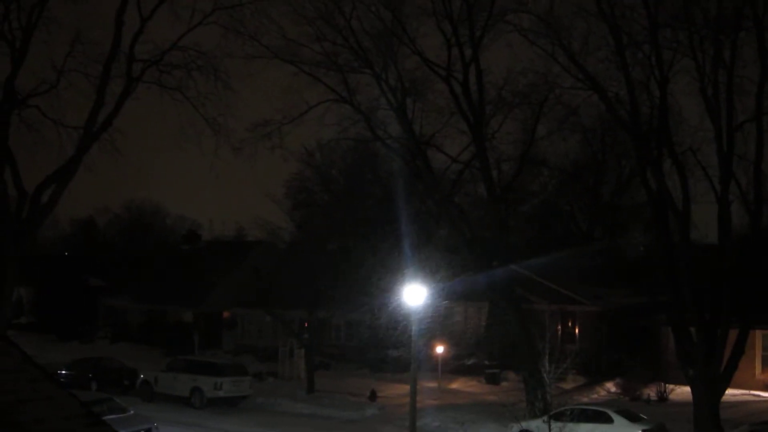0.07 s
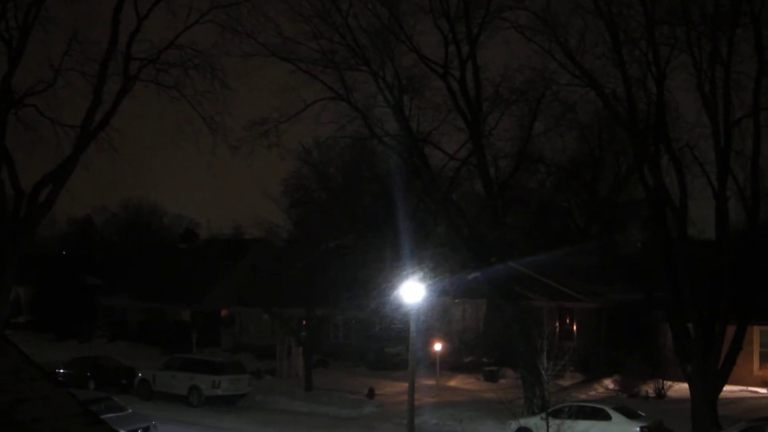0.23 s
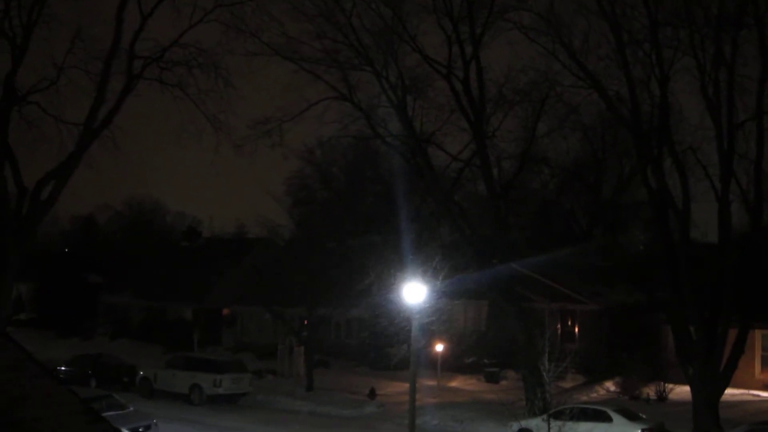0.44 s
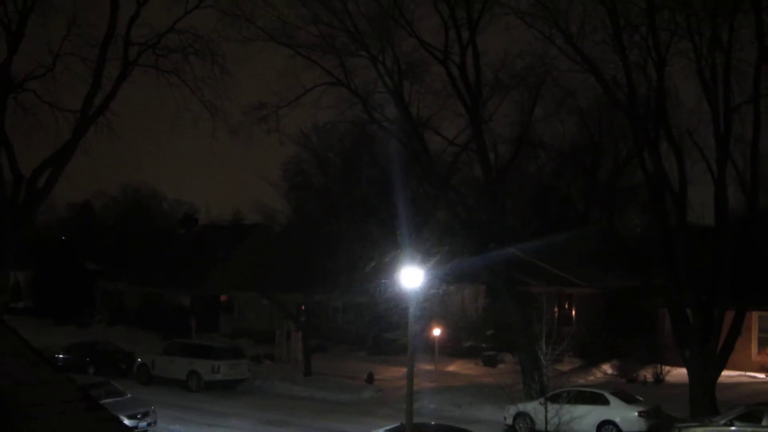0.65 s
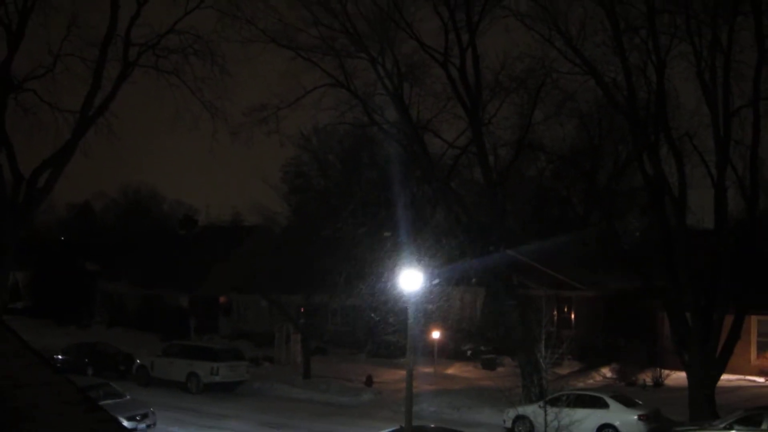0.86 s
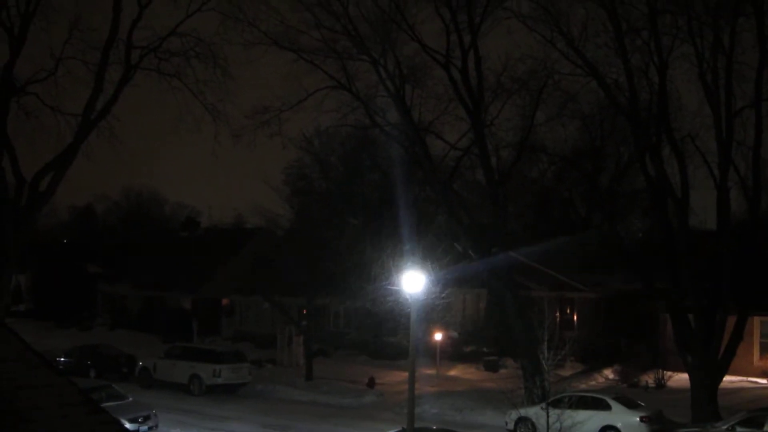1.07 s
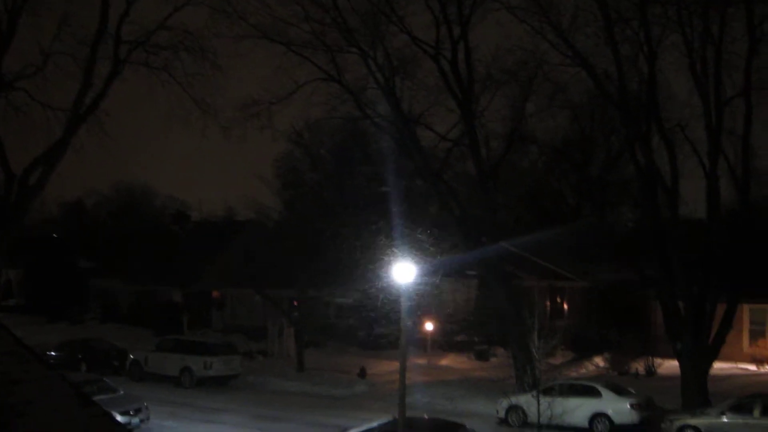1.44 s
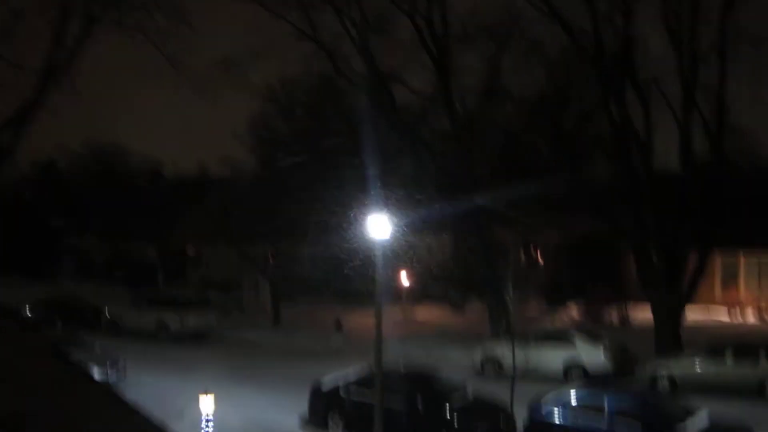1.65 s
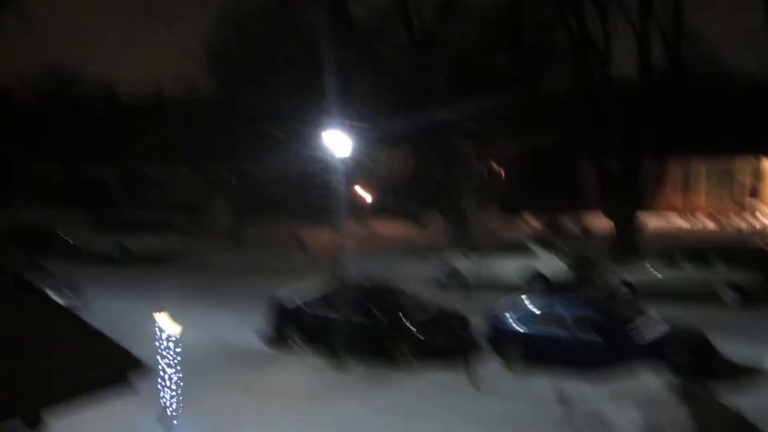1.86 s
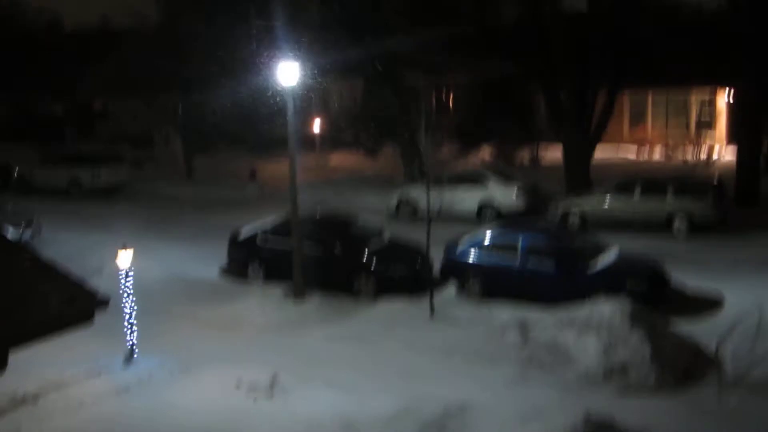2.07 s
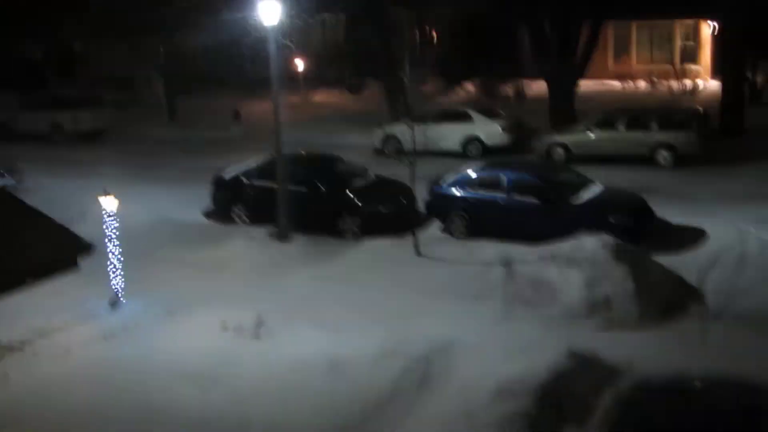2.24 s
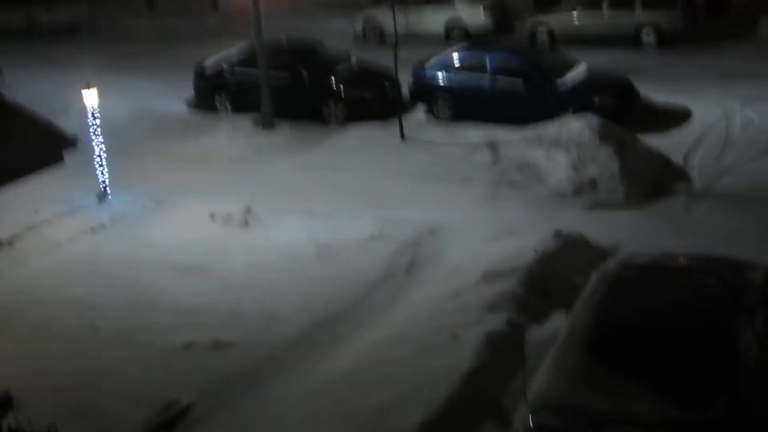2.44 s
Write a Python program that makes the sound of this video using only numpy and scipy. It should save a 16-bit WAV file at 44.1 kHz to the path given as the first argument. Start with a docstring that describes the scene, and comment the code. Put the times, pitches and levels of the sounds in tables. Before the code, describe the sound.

Wind rumbles low on the microphone, soon breaking into dull, uneven buffets that ease toward the end. Behind it lie the faint hush of a snowy street at night and a thin electronic hiss.

```python
"""A low rumble of wind right on the microphone, soon breaking into dull buffets.
Eddies roll over the port, each a pressure swing of about one cycle, stronger and quicker in a gust.
The place is a quiet, snowy street at night, with the town hushing far off and air in the bare trees.
The microphone sits in a hand-held camera, which adds its own hiss, a thin electronic whine
and, in the second half, a faint handling rustle."""
import sys
import numpy as np
from scipy import signal
from scipy.fft import rfft, irfft
from scipy.io import wavfile

SR = 44100
rng = np.random.default_rng(int(sys.argv[2]) if len(sys.argv) > 2 else 0)


def output_pcm(signal):
    """Save a mono or channel-first signal as 16-bit PCM at the path in sys.argv[1].

    Samples are clipped to [-1, 1] before scaling.
    """
    pcm = np.clip(np.atleast_2d(signal).T, -1, 1) * 32767
    wavfile.write(sys.argv[1], SR, np.round(pcm).astype(np.int16))


N = 110250

# far hush of the town: frequency_hz, relative_density_db
TOWN_SPECTRUM = [(200, -19), (450, 4), (650, -1), (900, -1.5), (1350, -2.5), (1650, -5.5), (2000, -12),
                 (3000, -25.5), (6000, -34)]
# its slow rise and fall: time_s, level_db
TOWN_LEVEL = [(0, -48.5), (.3, -48), (.65, -49.5), (.95, -47.5), (1.5, -48), (1.82, -46.5), (2.15, -47.5),
              (2.5, -47)]
# air in the bare trees: frequency_hz, relative_density_db
TREES_SPECTRUM = [(800, -48), (1700, -2), (2200, 0), (2700, 1), (3300, -3.5), (4200, -8), (5500, -14.5),
                  (9000, -41)]
# its slow rise and fall: time_s, level_db
TREES_LEVEL = [(0, -54.5), (.42, -53.5), (.68, -55.5), (1.18, -57), (1.65, -56), (2.5, -56)]
# the camera's electronic hiss: frequency_hz, relative_density_db
HISS_SPECTRUM = [(1000, -3), (4000, 1.5), (6500, 1), (8000, 1), (10000, -2), (12000, -5.5), (14000, -17),
                 (15700, -25)]
# its slight, uneven fall: time_s, level_db
HISS_LEVEL = [(0, -60), (.4, -61.5), (.65, -63), (1.05, -61.5), (2.5, -64.5)]
# electronic whine, a beating pair with two faint companions: pitch_hz, rms_level_db
WHINE_TONES = [(7822, -87), (7852, -76.3), (7882, -75.7), (13195, -94)]
# handling rustle on the camera body: frequency_hz, relative_density_db
RUSTLE_SPECTRUM = [(2000, -8), (5000, -2), (9000, -0.5), (12000, -4), (15700, -12)]
# the rustle coming in as the camera tilts down: time_s, level_db
RUSTLE_LEVEL = [(1.3, -89), (1.42, -63), (1.87, -63), (2.0, -65), (2.1, -63), (2.2, -65.5), (2.33, -62.5),
                (2.5, -65)]
# steady rumble of air moving past the microphone: frequency_hz, relative_density_db
RUMBLE_SPECTRUM = [(12, -24), (20, 8.5), (35, 5), (70, 4), (140, 2.5), (220, 1), (320, -3), (480, -11),
                   (700, -22), (1200, -46.5)]
# strength of the wind, as the typical level of its small eddies: time_s, level_db
GUST_LEVEL = [(0, -41), (.15, -43), (.28, -36), (.35, -30.5), (.47, -30.5), (.6, -27), (.7, -34),
              (.78, -31), (.88, -28.5), (.97, -34), (1.12, -29.5), (1.21, -36.5), (1.32, -36.5),
              (1.39, -33), (1.48, -29), (1.59, -41), (1.67, -35), (1.77, -32.5), (1.88, -48), (2.12, -49.5),
              (2.22, -38), (2.5, -51)]
# strong eddies that strike the microphone port: centre_s, level_db, pitch_hz
BUFFETS = [(0.212, -18.5, 66.4), (0.319, -14, 101), (0.362, -13.5, 115), (0.408, -11.5, 128),
           (0.463, -17.5, 106), (0.478, -10.5, 125), (0.501, -4.5, 140), (0.529, -15, 120),
           (0.538, -8.5, 129), (0.552, -9.5, 180), (0.567, -11, 147), (0.588, -7, 67.4), (0.598, -3.5, 165),
           (0.604, -14, 176), (0.636, -14, 160), (0.669, -11.5, 59.5), (0.73, -19.5, 61),
           (0.754, -11.5, 98), (0.807, -17, 69.4), (0.852, -18, 133), (0.865, -12.5, 184),
           (0.875, -12, 163), (0.881, -10.5, 186), (0.893, -14, 140), (0.902, -19, 179), (0.915, -18.5, 90),
           (0.929, -13.5, 103), (0.939, -23, 132), (0.953, -23, 102), (0.99, -8, 51), (0.995, -16, 79),
           (1.044, -15, 107), (1.059, -12, 118), (1.089, -14.5, 104), (1.098, -16.5, 134),
           (1.105, -13.5, 114), (1.138, -9.5, 106), (1.148, -14.5, 85.5), (1.169, -17, 72), (1.32, -24, 46),
           (1.341, -22, 48.6), (1.484, -17, 109), (1.496, -17, 108), (1.53, -14, 71), (1.573, -19.5, 166),
           (1.645, -15, 105), (1.666, -22.5, 51.5), (1.732, -10.5, 94), (2.185, -10, 60.3),
           (2.189, -9, 189), (2.194, -9.5, 213), (2.202, -8, 126)]

RUMBLE_DB, RUMBLE_FLUTTER_DB, RUSTLE_FLUTTER_DB = -37.5, 1, 1.5
EDDIES_PER_S, EDDY_SCATTER_DB = 340, 3
EDDY_HZ, EDDY_SPREAD_OCT, OCTAVES_PER_DB = 78, 0.76, 0.08   # pitch rises with the wind
EDDY_LOW_HZ, EDDY_TOP_HZ = 51.4, 240   # slowest and quickest small eddy
SWING_WIDTH_CYCLES = 0.22   # standard deviation of the bell around each swing
STEEPENING, FRONT_CYCLES = 0.53, 0.1   # extra speed at mid-swing per unit of pressure; width of that front
PHASE_SCATTER_RAD = 0.44   # about a plain push and pull
PORT_TOP_HZ, LOW_CUT_HZ, HIGH_CUT_HZ = 610, 24, 15750


def from_db(db):
    """Decibels to gain."""
    return 10 ** (np.asarray(db) / 20)


def rms_one(x):
    """Scale to unit rms."""
    return x / np.sqrt(np.mean(x ** 2) + 1e-20)


def in_time(rows):
    """A curve through (time_s, value) rows, at every sample."""
    return np.interp(np.arange(N) / SR, *np.transpose(rows))


def noise(spectrum):
    """Noise of unit rms, coloured by (frequency_hz, relative_density_db) rows."""
    hz, db = np.transpose(spectrum)
    bins_hz = np.maximum(np.arange(N // 2 + 1) * SR / N, 1)
    colour = from_db(np.interp(np.log(bins_hz), np.log(hz), db))
    return rms_one(irfft(rfft(rng.standard_normal(N)) * colour, N))


def drift(rate_hz):
    """Smooth random wandering of unit rms, mostly slower than rate_hz."""
    bins_hz = np.arange(N // 2 + 1) * SR / N
    return rms_one(irfft(rfft(rng.standard_normal(N)) / (1 + (bins_hz / rate_hz) ** 2), N))


def street_hush():
    """The town in the distance, and above it in pitch the air passing through bare trees."""
    town = from_db(in_time(TOWN_LEVEL)) * noise(TOWN_SPECTRUM)
    trees = from_db(in_time(TREES_LEVEL)) * noise(TREES_SPECTRUM)
    return town + trees


def camera_electronics():
    """The camera's own noise floor: hiss, and a thin whine whose close tones beat."""
    t = np.arange(N) / SR
    whine = sum(np.sqrt(2) * from_db(db) * np.sin(2 * np.pi * (hz * t + rng.random()))
                for hz, db in WHINE_TONES)
    hiss = from_db(in_time(HISS_LEVEL)) * noise(HISS_SPECTRUM)
    return hiss + whine


def handling_rustle():
    """A faint, uneven rustle close to the microphone while the camera moves in the hand."""
    level_db = in_time(RUSTLE_LEVEL) + RUSTLE_FLUTTER_DB * drift(rate_hz=20)
    return from_db(level_db) * noise(RUSTLE_SPECTRUM)


def air_rumble():
    """Air moving past the microphone: a steady low rumble with a slight flutter."""
    level_db = RUMBLE_DB + RUMBLE_FLUTTER_DB * drift(rate_hz=8.7)
    return from_db(level_db) * noise(RUMBLE_SPECTRUM)


def pressure_swings(centres_s, levels_db, pitches_hz):
    """One push and pull per eddy, in either order; the stronger the eddy, the steeper its front."""
    pressure = np.zeros(N)
    shapes = rng.standard_normal((len(centres_s), 2))
    for centre_s, db, hz, (polarity, lean) in zip(centres_s, levels_db, pitches_hz, shapes):
        span = np.arange(max(0, int((centre_s - 2 / hz) * SR)), min(N, int((centre_s + 2 / hz) * SR)))
        height = from_db(db)
        cycles = (span / SR - centre_s) * hz
        cycles += STEEPENING * height * FRONT_CYCLES * np.tanh(cycles / FRONT_CYCLES)
        bell = np.exp(-.5 * (cycles / SWING_WIDTH_CYCLES) ** 2)
        swing = np.sin(2 * np.pi * cycles + PHASE_SCATTER_RAD * lean)
        pressure[span] += np.sign(polarity) * height * bell * swing
    return pressure


def small_eddies():
    """A stream of random eddies over the port, their swings stronger and quicker as the wind rises."""
    count = int(EDDIES_PER_S * N / SR)
    time_jitter, pitch_jitter, level_jitter = rng.standard_normal((count, 3)).T
    centres_s = np.clip((np.arange(count) + time_jitter) / count, 0, 1) * N / SR
    wind_db = np.interp(centres_s, *np.transpose(GUST_LEVEL))
    octaves = EDDY_SPREAD_OCT * pitch_jitter + OCTAVES_PER_DB * (wind_db - wind_db.mean())
    pitches_hz = EDDY_TOP_HZ * np.tanh(EDDY_HZ * 2 ** octaves / EDDY_TOP_HZ)   # soft ceiling
    pitches_hz = np.maximum(EDDY_LOW_HZ, pitches_hz)
    return pressure_swings(centres_s, wind_db + EDDY_SCATTER_DB * level_jitter, pitches_hz)


def wind_on_microphone():
    """Strong buffets and small eddies right at the microphone, muffled by its port."""
    buffets = pressure_swings(*np.transpose(BUFFETS))
    port = signal.butter(4, PORT_TOP_HZ, fs=SR, output="sos")
    return signal.sosfilt(port, buffets + small_eddies())


def scene():
    """Street, camera and wind at one hand-held microphone, in mono."""
    background = street_hush() + camera_electronics() + handling_rustle()
    return (background + air_rumble() + wind_on_microphone())[None]


def record(dry):
    """The camera rolls off the deepest bass gently and cuts the top steeply."""
    low_cut = signal.butter(1, LOW_CUT_HZ, "high", fs=SR, output="sos")
    high_cut = signal.ellip(12, .1, 80, HIGH_CUT_HZ, fs=SR, output="sos")
    return signal.sosfilt(high_cut, signal.sosfilt(low_cut, dry))


dry = scene()
out = record(dry)
output_pcm(out)
```